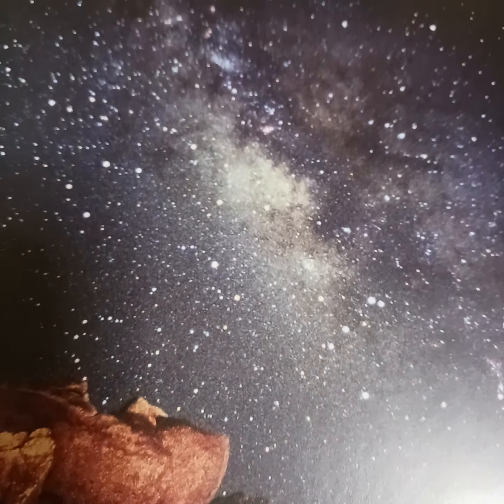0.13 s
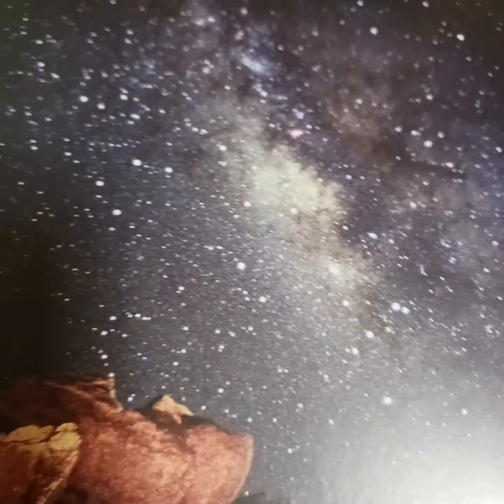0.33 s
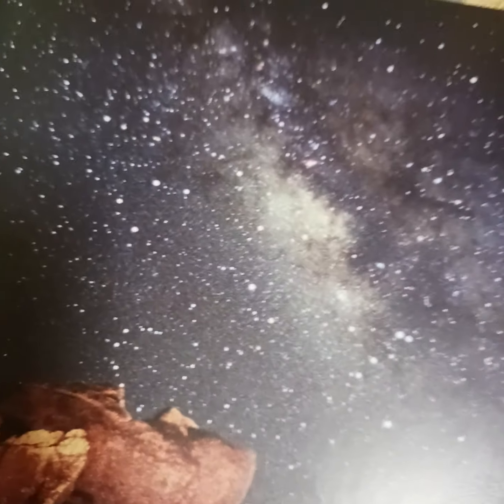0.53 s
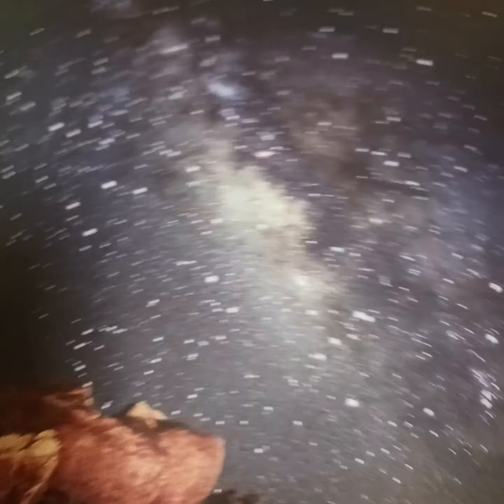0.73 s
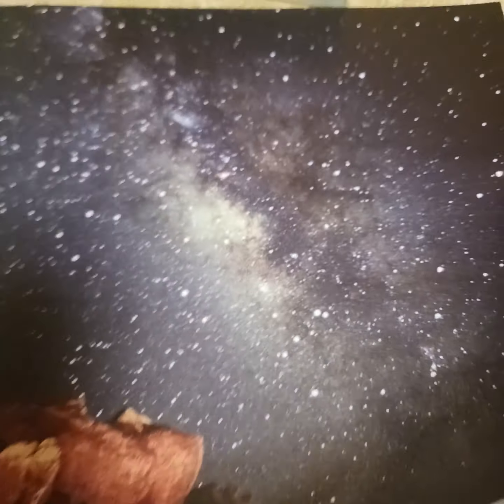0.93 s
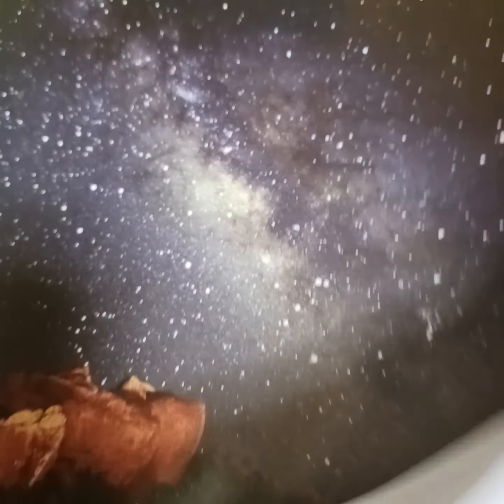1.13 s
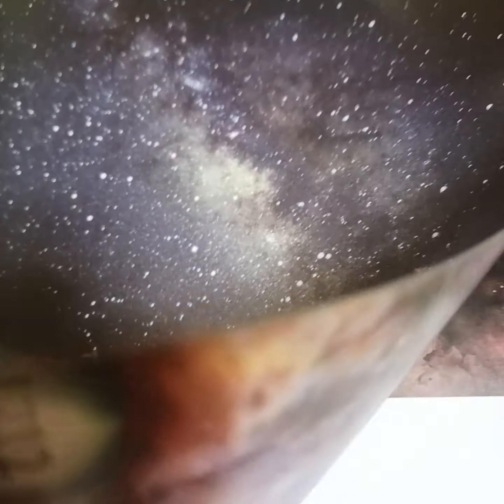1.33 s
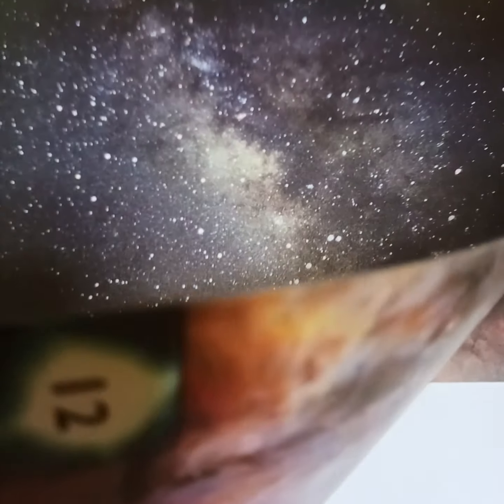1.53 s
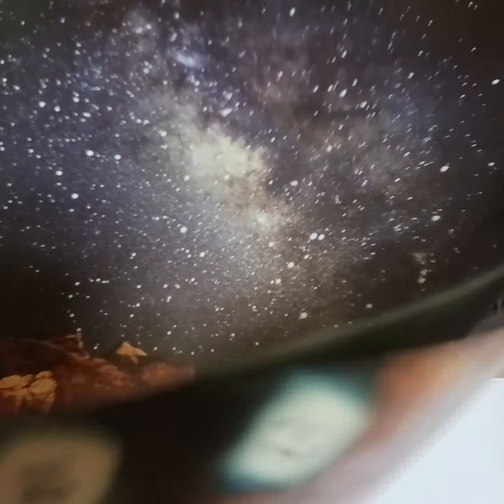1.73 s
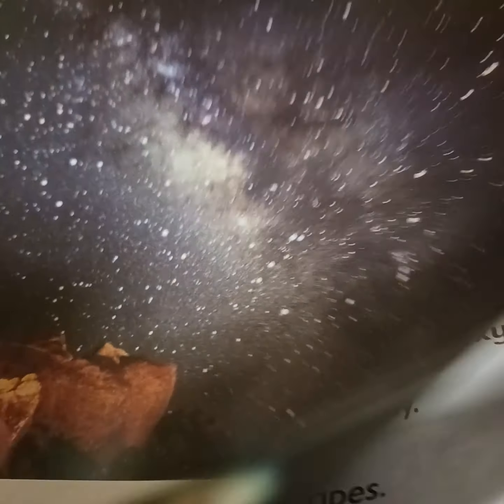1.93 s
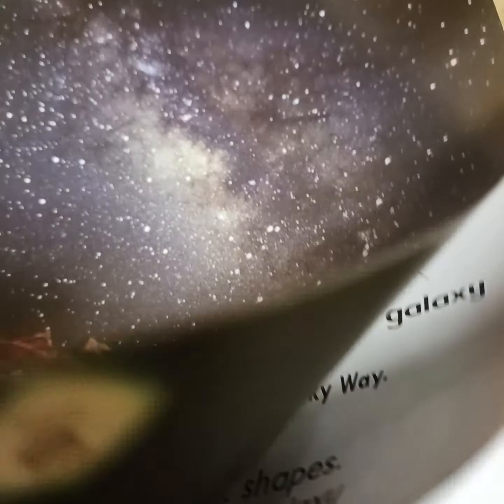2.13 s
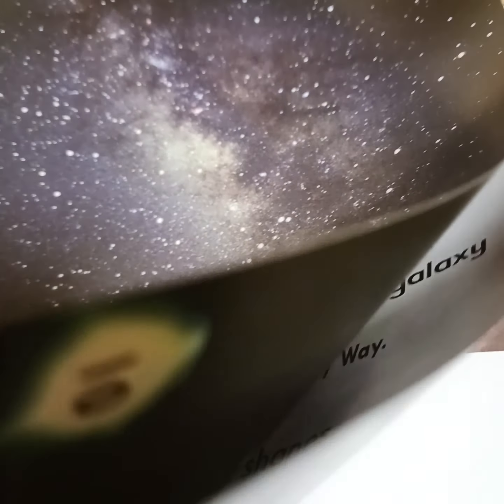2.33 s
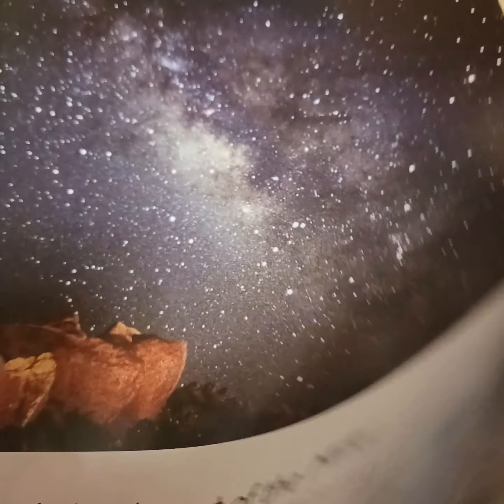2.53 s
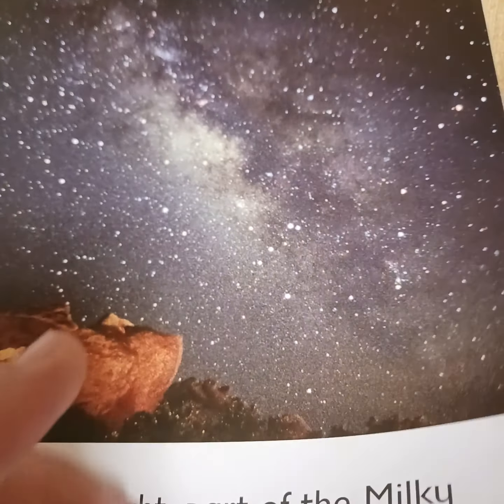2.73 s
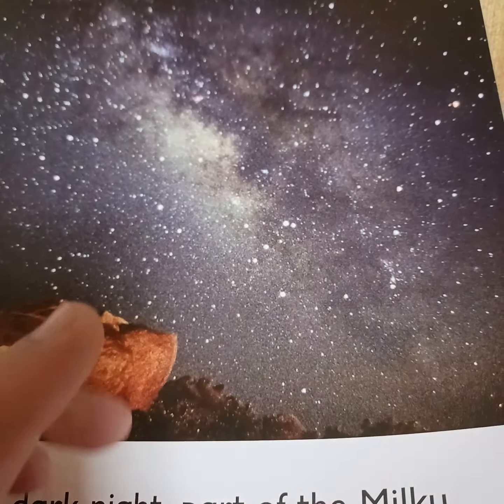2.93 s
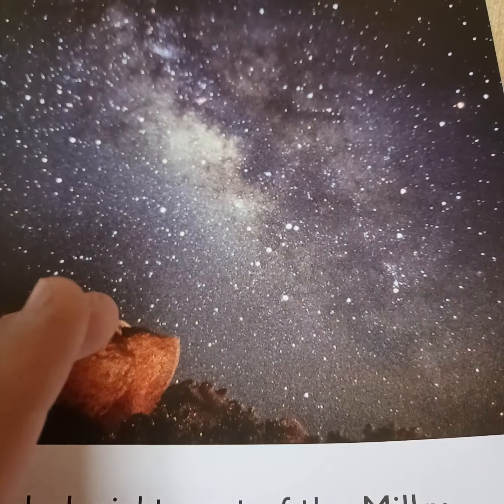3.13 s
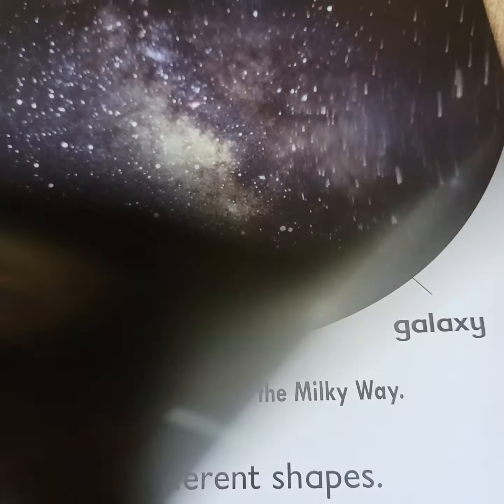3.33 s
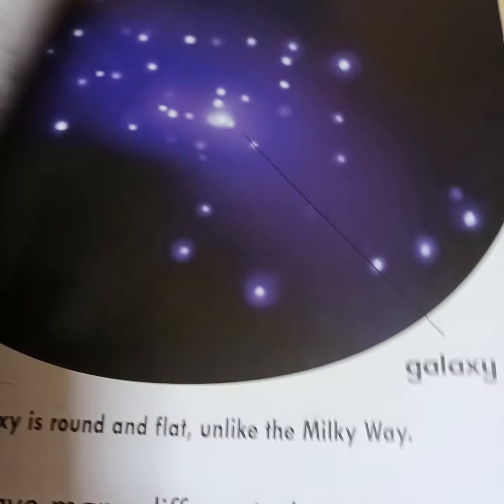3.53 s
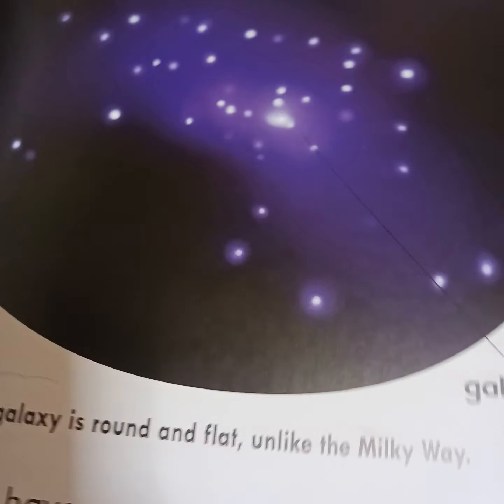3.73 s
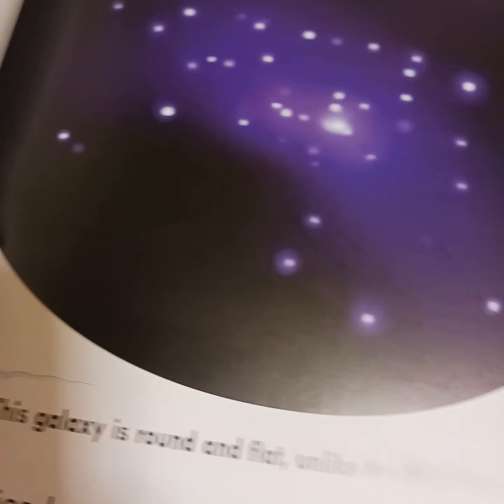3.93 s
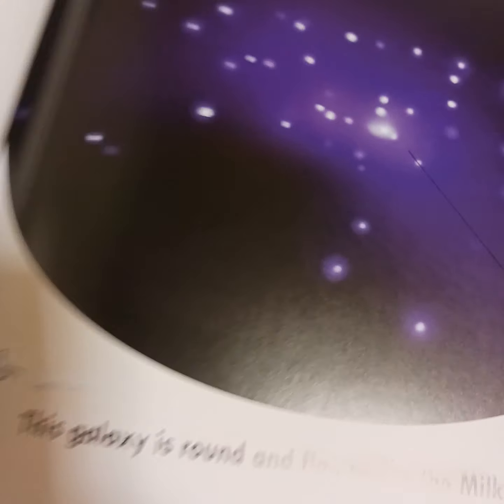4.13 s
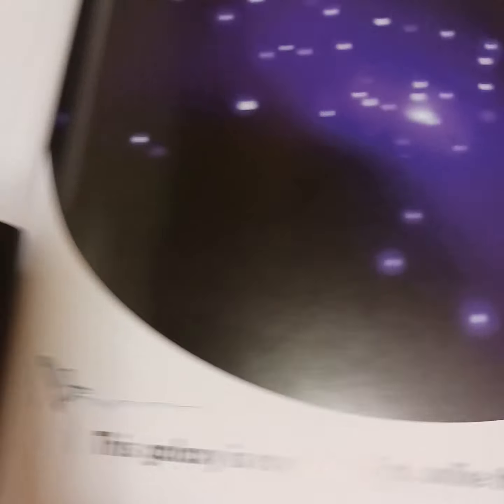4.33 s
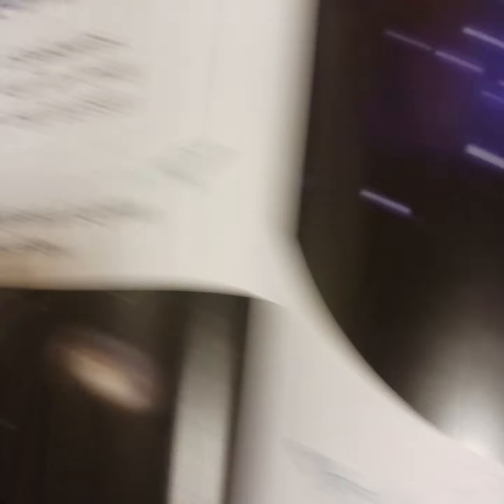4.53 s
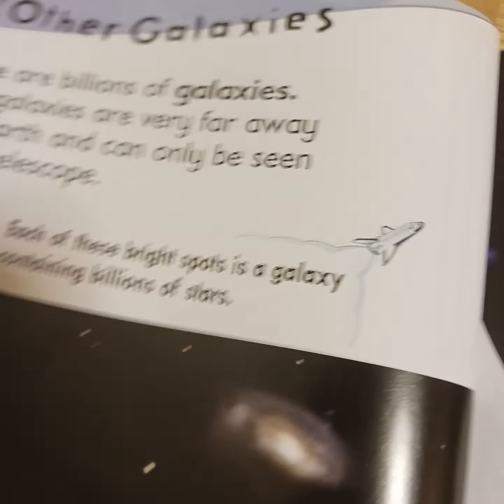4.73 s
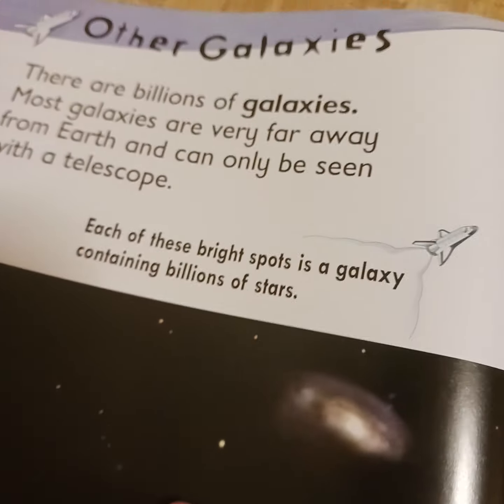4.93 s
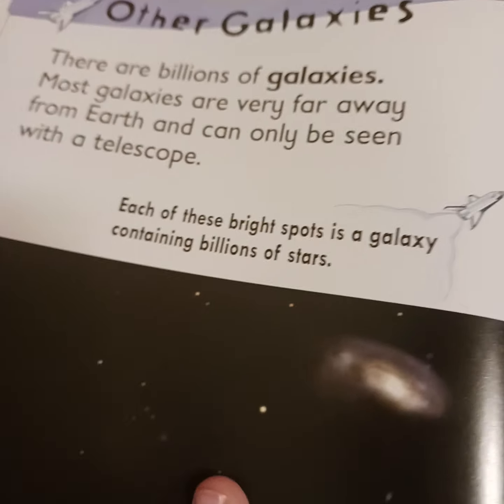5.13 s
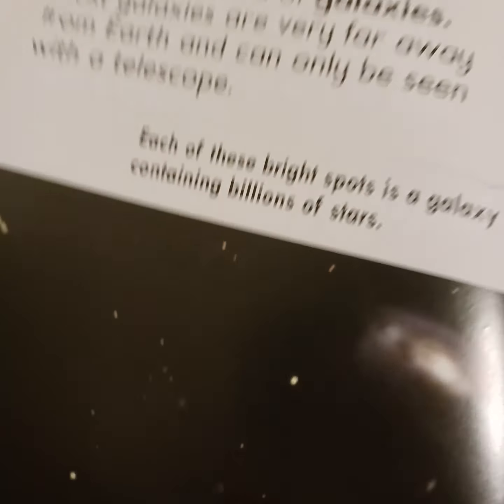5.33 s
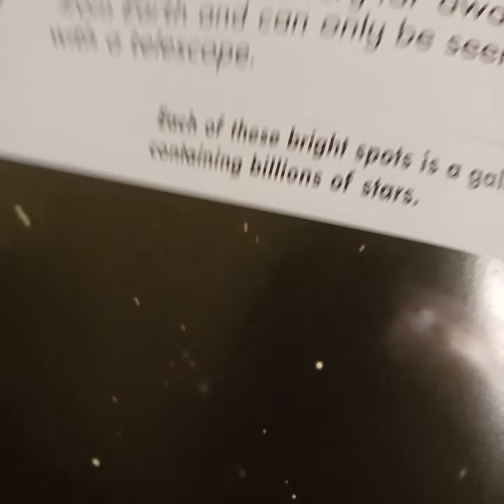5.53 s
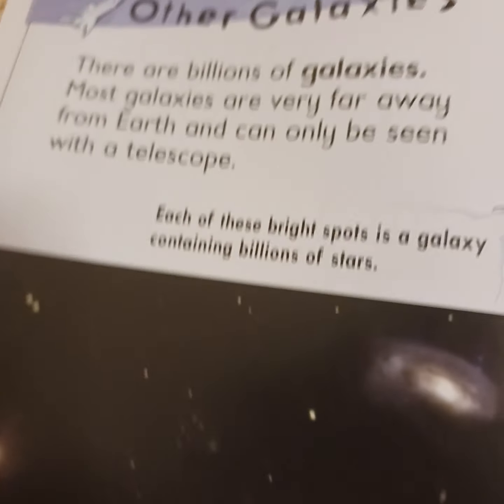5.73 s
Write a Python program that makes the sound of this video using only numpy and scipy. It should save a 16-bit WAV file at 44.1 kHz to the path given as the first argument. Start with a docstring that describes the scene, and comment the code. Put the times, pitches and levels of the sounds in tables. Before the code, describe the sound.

Pages of a book turn near the microphone. After almost silent room noise, paper ticks and scuffs, buckles with a hard pop and swishes over. Later a second sheet is pulled off fast with crisp cracks, followed by busy sliding and smoothing strokes that gradually soften, with brief small-room reflections.

```python
"""Glossy pages of a picture book are turned close by in a quiet room, over a low hum and faint hiss.
Creases tick, a sheet is lifted with rubs and crackles, buckles with a snap (decaying modes) and sweeps over.
Later a second sheet is dragged quickly off its neighbour, and a hand rubs the open pages flat.
Rubs and sweeps are filtered friction noise, creases and air puffs are shaped noise, chatters are resonated noise.
Paper strokes, creases and the snap ring briefly in the room."""
import sys
import numpy as np
from scipy import signal
from scipy.fft import rfft, irfft
from scipy.io import wavfile
from scipy.ndimage import map_coordinates

SR = 44100
rng = np.random.default_rng(int(sys.argv[2]) if len(sys.argv) > 2 else 0)


def log_audio(samples):
    """Write samples as a 16-bit WAV file to the path given in sys.argv[1]."""
    # one column per channel
    frames = np.atleast_2d(samples).T
    # limit to full scale, then quantise
    limited = np.clip(frames, -1, 1)
    pcm = np.round(limited * 32767).astype(np.int16)
    wavfile.write(sys.argv[1], SR, pcm)


N = 255691


def amp(db):
    """Decibels to gain."""
    return 10 ** (np.asarray(db) / 20)


def unit(x):
    """Scales to rms 1 over all channels."""
    return x / np.sqrt(np.mean(x ** 2) + 1e-20)


def read(points, hz):
    """Reads a spectrum on a log-frequency axis."""
    f, value = np.transpose(points)
    return np.interp(np.log(hz + 1), np.log(f + 1), value)


def colour(x, points):
    """Filters by a spectrum of (freq_hz, gain_db)."""
    size = x.shape[-1]
    gain = amp(read(points, np.fft.rfftfreq(size, 1 / SR)))
    return irfft(rfft(x) * gain, size)


def sides(pan_db):
    """Left and right gains of constant total power; pan_db is left over right."""
    left = amp(np.atleast_1d(pan_db))
    return np.array([left, np.ones_like(left)]) * np.sqrt(2 / (1 + left ** 2))


def add(mix, start_s, sound):
    """Mixes a stereo sound in at start_s."""
    part = mix[:, max(round(start_s * SR), 0):][:, :sound.shape[1]]
    part += sound[:, :part.shape[1]]


def resonate(x, hz, width_hz):
    """A resonance that follows the curve hz: shift to 0 Hz, one-pole low-pass, shift back."""
    turn = np.exp(2j * np.pi * np.cumsum(hz) / SR)
    r = np.exp(-np.pi * width_hz / SR)
    return 2 * (turn * signal.lfilter([1 - r], [1, -r], x / turn)).real


# Room noise spectrum, relative: freq_hz, gain_db
ROOM_AIR = [(20, -25), (55, -4), (85, -2.5), (140, 2), (200, -4.5), (300, -4), (430, -5.5), (700, -26),
            (1300, -25), (5000, -31.5), (15500, -21.5)]
# Hum partials, before hum_db: pitch_hz, level_db
HUM = [(140.0, -71.5), (220.7, -78)]


def background(air_db=-67, hum_db=2.0, waver_db=2, pan_db=3.0):
    """Partly shared low room noise with a faint hiss, plus a hum wavering in level and phase."""
    shared_db = [(60, -0.5), (140, -4), (350, -2.0), (700, -14.5), (1400, -22.0)]
    apart_db = [(60, 0.5), (140, -10.0), (350, -7), (700, 0), (1400, -3)]
    shared = colour(rng.standard_normal(N), shared_db)
    apart = colour(rng.standard_normal((2, N)), apart_db)
    air = amp(air_db) * unit(colour(shared + apart, ROOM_AIR))
    waver = unit(colour(rng.standard_normal(N), [(6, -0.5), (25, -39), (100, -120)]))
    t = np.arange(N) / SR
    hum = 0
    for pitch_hz, level_db in HUM:
        phase = 2 * np.pi * pitch_hz * t + .5 * waver
        hum = hum + amp(level_db + hum_db + waver_db * waver) * np.sin(phase)
    return (air + hum) * sides(pan_db)


# Creases and edge flicks: start_s, level_db (before boost_db), low_db (lows over highs, before -1 dB), pan_db
TICKS = [(0.0723, -58.0, -10, 1), (0.094, -53, -22, 1), (0.605, -59.5, -10, 5), (0.8807, -42, -4, 5),
         (0.914, -47, -8, 5), (0.9785, -44.5, 0, 3.5), (1.0224, -42.5, -4, 1), (1.0862, -50.5, -8, 3.5),
         (1.2377, -48.5, -15.5, 8.5), (1.283, -45, 0, 2), (1.3166, -43.5, 1, 0), (1.331, -49, -1, -1),
         (1.346, -44.5, -2, 3.5), (1.486, -46, -6.5, 1), (1.508, -32, 2, 2.5), (1.621, -56, 10, 12),
         (1.7975, -30.5, 20, -5), (1.934, -34, 3, 0), (2.033, -55, 9, 7), (2.0646, -56, 10, 13),
         (2.972, -48.5, -7, 3), (3.359, -51, 4.5, -5), (3.4244, -31.5, -9, 5), (3.4513, -21, -17, 3),
         (3.463, -26.5, -3, 0), (3.4735, -24, -2, 6), (3.508, -23, -0.5, 8), (3.8513, -31.5, -5, 5),
         (3.8876, -30.5, -0.5, 4.5), (4.0361, -37.5, 12, -2), (4.0641, -35.5, 15, 2),
         (4.1825, -44.5, -7, 4), (5.143, -57, 22, 4)]
# Crease spectrum, relative: freq_hz, gain_db
TICK_COLOUR = [(200, -9.5), (900, -5.5), (1800, 6), (3500, -2.5), (6000, -1.5), (9000, -8.5), (15500, -13)]


def ticks(boost_db=5, decay_s=0.0019, crumple_db=-22):
    """A crease gives way in a sharp crack, followed by a few ms of fine crumpling."""
    out, t = np.zeros((2, N)), np.arange(2048) / SR
    rise, crumple = 1 - np.exp(-t / .0005), np.exp(-t / .008)
    shape = rise * (np.exp(-t / decay_s) + amp(crumple_db) * crumple)
    for start_s, level_db, low_db, pan_db in TICKS:
        crack = colour(rng.standard_normal((2, len(t))), TICK_COLOUR)
        crack = colour(crack, [(2000, low_db - 1), (3500, 0.0006)]) * shape
        # each channel gets the energy of the envelope
        crack *= np.linalg.norm(shape) / np.linalg.norm(crack, axis=1, keepdims=True)
        add(out, start_s, amp(level_db + boost_db) * crack * sides(pan_db))
    return out


def friction(size, slips_per_s, spread_db, slip_share, judder_db, judder_hz):
    """Fibres catch and slip: a fine hiss plus separate slips, under an unsteady contact."""
    strength = amp(spread_db * np.minimum(rng.exponential(1, size), 3))
    happens = rng.random(size) < slips_per_s / SR
    slips = unit(strength * happens * rng.choice([-1, 1], (2, size)))
    share = np.clip(slip_share, 0, 1)
    low_pass = signal.butter(2, judder_hz, fs=SR, output="sos")
    contact = np.tanh(unit(signal.sosfilt(low_pass, rng.standard_normal(size))))
    hiss = rng.standard_normal((2, size))
    return (np.sqrt(share) * slips + np.sqrt(1 - share) * hiss) * amp(judder_db * contact)


def between_pages(x, path_s, bounce, drift, count=3):
    """Glossy pages mirror the sound; their slowly changing distance moves a comb of peaks through it."""
    n, out = np.arange(x.shape[1]), x.copy()
    for ear in range(2):
        for order, (distance, phase, rate_hz) in enumerate(rng.random((count, 3))):
            wander = 1 + drift * np.sin(2 * np.pi * (phase + rate_hz * n / SR))
            delay = path_s * SR * (order + 1 + distance) * wander
            echo = map_coordinates(x[ear], [n - delay], order=3)
            out[ear] += bounce * rng.choice([-1, 1]) * echo
    return out


def stroke_speed(size, fastest):
    """A stroke speeds up from rest and slows to rest again in one lopsided arch."""
    progress = np.arange(size) / size
    return np.sin(np.pi * np.interp(progress, [0, np.clip(fastest, .05, .95), 1], [0, .5, 1]))


def crackles(size, per_s, decay_s):
    """Tiny creases give way at random moments, each in a short burst."""
    onsets = rng.random(size) * (rng.random(size) < per_s / SR)
    envelope = signal.lfilter([1], [1, -np.exp(-1 / (decay_s * SR))], onsets)
    return envelope * rng.standard_normal((2, size))


# Strokes of hand or sheet across paper: start_s, length_s, fastest (share of length), hiss_db,
# body_db (hollow tone of the pressed sheet), fizz_db (top over hiss, before boost), pan_db
RUBS = [(0.561, 0.31, 0.62, -67.5, -96, 3, 6), (0.785, 0.12, 0.86, -57.5, -63, -12, 10),
        (0.911, 0.035, 0.18, -59, -59.5, 0, 3), (0.979, 0.046, 0.13, -62, -58, -14, 4),
        (1.017, 0.091, 0.095, -58.5, -53.5, -10, 4), (1.2, .19, 0.68, -71.5, -61.5, -19, -2),
        (1.919, 0.29, 0.42, -67, -81, -4, 7.5), (2.168, 0.31, 0.098, -74, -82, 1, 8),
        (2.459, .13, 0.72, -78.5, -99.5, 7.5, 9), (3.052, 0.17, 0.55, -80, -96, 5, 8),
        (3.256, .085, 0.67, -58.5, -83, -11, 7.5), (3.351, 0.052, 0.26, -61.5, -65, -10, 1),
        (3.57, 0.21, 0.55, -61, -67, 0, 3.5), (3.699, .24, 0.42, -51.5, -59.5, -3.5, 7),
        (3.841, 0.075, 0.54, -49.5, -47, -2, 5), (3.945, .1, 0.59, -49.5, -58, -2, 9),
        (4.029, 0.18, 0.32, -50.5, -56, 0, 7), (4.048, .04, .4, -52, -46, -13, 5),
        (4.185, 0.34, .33, -53, -61, 3.5, 7), (4.385, .305, 0.49, -45.5, -47.5, -1.5, 5),
        (4.471, 0.17, 0.51, -44, -47, -13, 3), (4.685, .2, 0.39, -55, -60.5, 1.5, 5.5),
        (4.83, .28, 0.46, -59, -65.5, -2, 6), (4.995, 0.099, 0.26, -61.5, -56, -11, 4),
        (5.12, 0.15, 0.22, -73, -58, -8, 6.5), (5.169, .17, 0.72, -56, -68, -1, 5),
        (5.302, 0.23, 0.36, -64.5, -71.5, 1.5, 8), (5.529, 0.27, 0.36, -71.5, -82.5, 1.5, 9.5)]
# Spectra of hiss, hollow tone and top fizz, relative: freq_hz, gain_db
RUB_HISS = [(400, -26), (1000, -25.5), (1700, -3), (2400, 1), (3300, 0.5), (4500, -0.5), (6300, 2),
            (8000, -4.5), (10000, -24), (15500, -29)]
RUB_BODY = [(150, -22.5), (400, -4.5), (650, -6), (880, 0), (1200, -4), (1700, -9.5), (3000, -21.5)]
RUB_FIZZ = [(400, -56), (6000, -12), (8500, -6.5), (11000, -2), (15500, 1.5)]


def rubbing(fizz_boost_db=3.0, hiss_growth=0.9, body_growth=0.92, rumble_db=-63, rumble_growth=.22,
            full_press_db=-55, crackle_db=-11):
    """Skin and paper slide on paper: crackling hiss, a hollow tone of the pressed sheet, a dull book rumble."""
    out = np.zeros((2, N))
    rumble_colour = [(20, -20), (70, 0), (140, -1), (220, -8), (500, -17.5), (3000, -59.5)]
    for start_s, length_s, fastest, hiss_db, body_db, fizz_db, pan_db in RUBS:
        speed = stroke_speed(round(length_s * SR), fastest)
        size = len(speed)
        drive = friction(size, slips_per_s=620, spread_db=2.0, slip_share=0.2, judder_db=1.5, judder_hz=49.5)
        drive = between_pages(drive, path_s=.0006, bounce=.25, drift=.3)
        bright = amp(hiss_db) * unit(colour(drive, RUB_HISS))
        bright += amp(hiss_db + fizz_db + fizz_boost_db) * unit(colour(drive, RUB_FIZZ))
        crackling = colour(crackles(size, per_s=70, decay_s=.001), TICK_COLOUR)
        bright += amp(hiss_db + crackle_db) * unit(crackling)
        hollow = amp(body_db) * unit(colour(drive, RUB_BODY))
        rumble = unit(colour(rng.standard_normal(size), rumble_colour))
        rumble *= amp(rumble_db + rumble_growth * (body_db - full_press_db))
        sound = bright * speed ** hiss_growth + hollow * speed ** body_growth + rumble * np.sqrt(speed)
        add(out, start_s, sound * sides(pan_db))
    return out


# Moments of chatter around one bending tone: start_s, level_db, length_s, pitch_hz
CHATTERS = [(0.605, -70.5, 0.23, 3100), (1.21, -68, 0.082, 1800), (1.741, -33, 0.037, 1180),
            (1.813, -38.5, 0.036, 630), (1.815, -32.5, 0.029, 1245), (1.854, -37, .042, 456),
            (2.559, -85, 0.4, 3550), (2.56, -84.5, 0.37, 5900), (3.152, -76, 0.044, 2460),
            (3.436, -39.5, 0.03, 1720), (3.49, -31, 0.019, 2370), (4.059, -46, 0.016, 804),
            (4.213, -55, .034, 820), (4.423, -49, 0.23, 867), (5.021, -52.5, 0.036, 923),
            (5.134, -61, 0.1, 1070), (5.295, -66.5, 0.12, 456)]


def chatters(width_share=0.22, pan_db=3, apart=1.0):
    """Uneven slips, as noise, drive one bending tone of the sheet, whose two faces push in opposite directions."""
    out, warm_up = np.zeros((2, N)), 4096
    for start_s, level_db, length_s, pitch_hz in CHATTERS:
        size = round(length_s * SR)
        slips = np.array([[1], [-.5]]) * rng.standard_normal(warm_up + size)
        slips = slips + apart * rng.standard_normal((2, warm_up + size))
        pitch, width_hz = np.full(slips.shape[1], pitch_hz), width_share * pitch_hz
        tone = resonate(resonate(slips, pitch, width_hz), pitch, width_hz)[:, -size:]
        add(out, start_s, amp(level_db) * unit(tone) * signal.windows.tukey(size, .5) * sides(pan_db))
    return out


# Air pushed by a sheet, or the book shifting: start_s, level_db, length_s, upper_edge_hz
PUFFS = [(0.799, -63, 0.3, 200), (1.385, -52.5, .02, 445.5), (1.422, -55, 0.051, 158),
         (1.507, -45.5, 0.048, 87), (1.755, -51.5, 0.086, 425.3), (1.804, -47, 0.063, 143),
         (1.874, -44.5, 0.078, 183), (3.473, -48, 0.11, 389), (3.54, -50.5, 0.04, 110),
         (3.688, -56, 0.22, 152), (4.268, -62.5, 0.12, 91), (5.009, -60.5, 0.075, 400),
         (5.526, -62.5, 0.061, 394)]


def puffs(apart=0.87, pan_db=2):
    """Soft low pushes of air that swell quickly and die away."""
    out, t = np.zeros((2, N)), np.arange(16384) / SR
    for start_s, level_db, length_s, edge_hz in PUFFS:
        air = rng.standard_normal(len(t)) + apart * rng.standard_normal((2, len(t)))
        air = unit(colour(air, [(20, -20), (50, 0), (edge_hz, -3), (2.3 * edge_hz, -24), (8000, -70)]))
        u = np.pi * t / length_s
        add(out, start_s, amp(level_db) * air * u * np.exp(1 - u) * sides(pan_db))
    return out


# Modes of the buckling sheet, relative: pitch_hz, level_db, t60_s
SHEET = [(512, -19, 0.0095), (917, -11.5, 0.012), (1758, -0.5, 0.011), (2443, -4.5, 0.0075),
         (2880, -1, .005), (4225, -13.5, 0.0061)]
# Snap burst spectrum, relative: freq_hz, gain_db
SNAP_BURST = [(150, -6.5), (500, -6.5), (1000, -4), (1700, 0.5), (3000, -2), (4200, -5.5), (5600, -13),
              (7000, -12.5), (9000, -25), (15500, -28)]


def snap(start_s=1.3826, level_db=-7, rise_s=0.00068, pan_db=2, right_late_s=.0005, burst_db=-6.5,
         burst_s=0.0014):
    """The bent sheet flips its curve: a broad pop, and a ring of a few cycles."""
    out, t = np.zeros((2, N)), np.arange(2048) / SR
    age = np.maximum(t - np.array([[0], [right_late_s]]), 0)
    ring = np.zeros_like(age)
    for k, (pitch_hz, mode_db, t60_s) in enumerate(SHEET):
        ring += (-1) ** k * amp(mode_db - 60 * age / t60_s) * np.sin(2 * np.pi * pitch_hz * age)
    burst = unit(colour(rng.standard_normal(age.shape), SNAP_BURST))
    burst = amp(burst_db) * burst * np.exp(-age / burst_s)
    rise = 1 - np.exp(-age / rise_s)
    add(out, start_s, amp(level_db) * (ring + burst) * rise * sides(pan_db))
    return out


# Pushes of a sheet as it sweeps over and lands: turn (kind), start_s, swell_s, held_s, fade_db_per_s,
# level_db, gap_hz (initial air resonance under the sheet), sag_oct_per_s, gap_db (its share), pan_db
PUSHES = [("slow", 1.613, 0.041, .159, 2600, -33, 1880, 1.64, 0.33, 6),
          ("slow", 1.792, 0.0017, .066, 210, -34, 1570, .4, -0.69, 3.2),
          ("fast", 3.424, 0.017, .087, 3060, -24, 1860, -5, -12, 2),
          ("fast", 3.508, .002, 0.0073, 293, -36, 1100, 10, 0, 1.5)]
# Edge hiss spectra of the slow and fast turn, relative: freq_hz, gain_db
SLOW_HISS = [(150, -20), (500, -9.5), (1000, -20.5), (1700, 2), (2500, 6), (3600, 4), (5500, 7),
             (9000, -7.5), (15500, -12)]
FAST_HISS = [(200, -30), (700, -20), (1100, -10), (1600, -7.5), (3000, -4), (4200, 1.5), (6500, -3.5),
             (9000, -10.5), (15500, -28.5)]


def sweep(turn, spectrum, gap_width_hz, slips_per_s, slip_share, fizz_db, fizz_growth, swell_db,
          opening_db_per_s, brighten_db_per_s, bass_db_per_s):
    """A page edge scrapes its neighbour: pushes swell, hold and fade; the air pocket under it glides in pitch."""
    out = np.zeros((2, N))
    pushes = [row for kind, *row in PUSHES if kind == turn]
    for start_s, swell_s, held_s, fade_db_per_s, level_db, first_hz, sag, gap_db, pan_db in pushes:
        t = np.arange(0, held_s + 45 / fade_db_per_s, 1 / SR)
        effort_db = -swell_db * np.exp(-t / swell_s) - fade_db_per_s * np.maximum(t - held_s, 0)
        gap_hz = first_hz * 2 ** (-sag * t)
        to_go_s = np.maximum(held_s - t, 0)
        drive = friction(len(t), slips_per_s, spread_db=2.5, slip_share=slip_share, judder_db=2.5, judder_hz=200)
        drive = between_pages(drive, path_s=.0009, bounce=.33, drift=.15)
        pocket = resonate(resonate(drive, gap_hz, gap_width_hz), gap_hz, gap_width_hz)
        sound = unit(colour(drive, spectrum))
        sound += amp(gap_db - opening_db_per_s * to_go_s) * unit(pocket)
        # a sheet that still lies close gives off little bass
        bass = colour(sound, [(900, 0), (1300, -7), (1800, -22), (4000, -60)])
        sound += (amp(-bass_db_per_s * to_go_s) - 1) * bass
        # more effort sends a larger share of hiss to the top octave
        top_db = fizz_db + fizz_growth * effort_db - brighten_db_per_s * to_go_s
        sound += amp(top_db) * unit(colour(drive, RUB_FIZZ))
        add(out, start_s, sound * amp(level_db + effort_db) * sides(pan_db))
    return out


def room(x, wet_db, mid_t60_s, low_t60_s=0.34, high_t60_s=.3, first_s=0.0053):
    """The dense reflections of a small room: noise whose bands decay at their own rates."""
    hz, t, z = signal.stft(rng.standard_normal((2, SR // 2)), SR, nperseg=256)
    t60_s = read([(250, low_t60_s), (3000, mid_t60_s), (12000, high_t60_s)], hz)[:, None]
    tail = signal.istft(z * amp(-60 * t / t60_s), SR, nperseg=256)[1]
    tail = tail * (np.arange(tail.shape[1]) > first_s * SR)
    return amp(wet_db) * signal.fftconvolve(x, tail / np.linalg.norm(tail[0]), axes=1)[:, :N]


# Snap as it leaves for the walls, over its direct sound: freq_hz, gain_db
SNAP_OUTWARD = [(300, 1.5), (950, 3.5), (1300, -1), (1750, -8), (2600, -1), (4000, 5), (6000, -1),
                (12000, 0)]


def scene():
    """All the paper sounds in the room, over its background."""
    creases, pop = ticks(), snap()
    sliding = rubbing() + chatters()
    sliding += sweep("slow", SLOW_HISS, gap_width_hz=1420, slips_per_s=1300, slip_share=0.48,
                     fizz_db=-11.0, fizz_growth=.1, swell_db=42, opening_db_per_s=133,
                     brighten_db_per_s=-23, bass_db_per_s=50)
    sliding += sweep("fast", FAST_HISS, gap_width_hz=1200, slips_per_s=3500, slip_share=0.55,
                     fizz_db=-5, fizz_growth=0.95, swell_db=27.5, opening_db_per_s=10.5,
                     brighten_db_per_s=220.5, bass_db_per_s=131)
    echo = room(creases, wet_db=-7.5, mid_t60_s=0.27)
    echo += room(sliding, wet_db=-11, mid_t60_s=0.31)
    echo += room(colour(pop, SNAP_OUTWARD), wet_db=-4.0, mid_t60_s=0.35, high_t60_s=0.33)
    return background() + creases + sliding + puffs() + pop + echo


# Microphone response: freq_hz, gain_db
MICROPHONE = [(7100, 0.5), (8300, -8), (10300, -7), (11800, -1), (15500, -2.5)]


def record(dry, edge_hz=16000):
    """The microphone's treble notch, then the band limit."""
    band_limit = signal.firwin(511, edge_hz, window=("kaiser", 9), fs=SR)
    return signal.oaconvolve(colour(dry, MICROPHONE), band_limit[None], "same")


dry = scene()
out = record(dry)
log_audio(out)
```